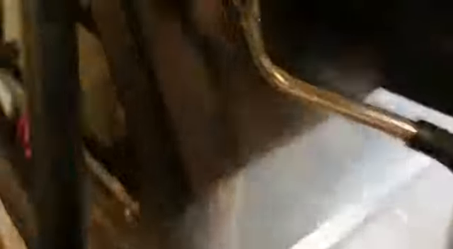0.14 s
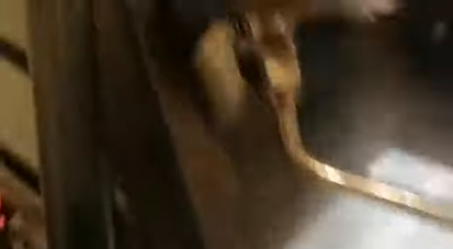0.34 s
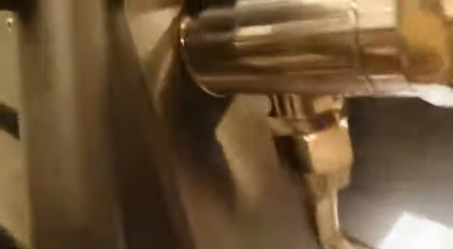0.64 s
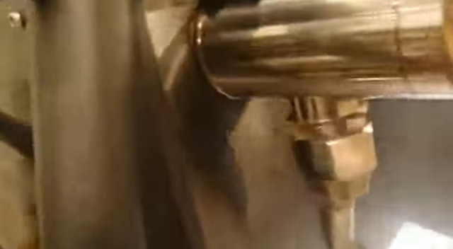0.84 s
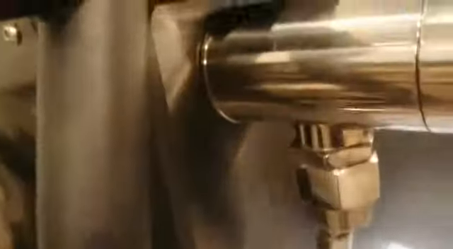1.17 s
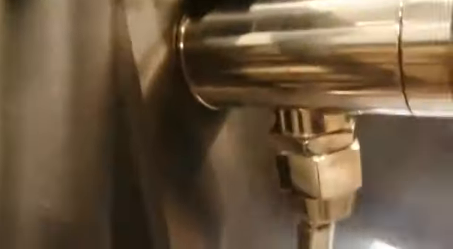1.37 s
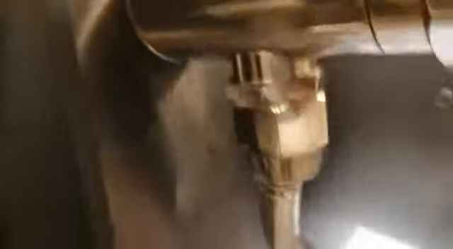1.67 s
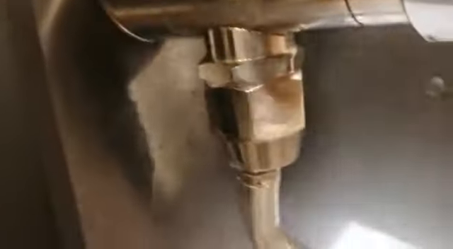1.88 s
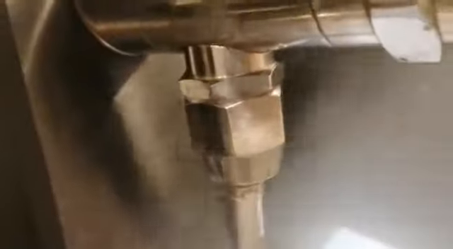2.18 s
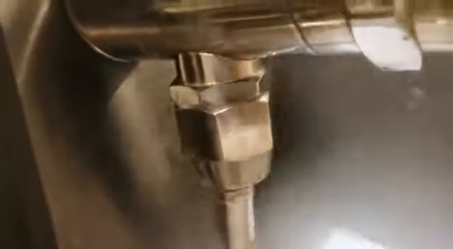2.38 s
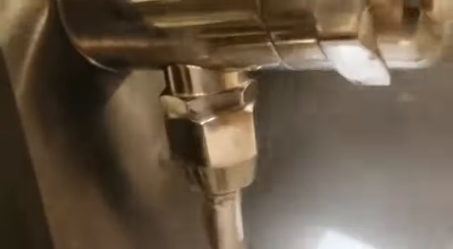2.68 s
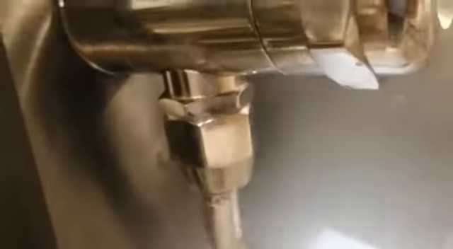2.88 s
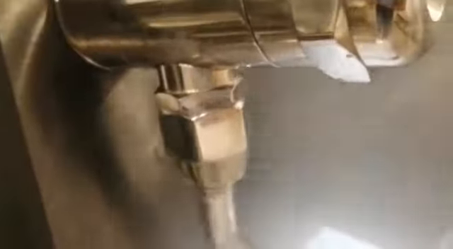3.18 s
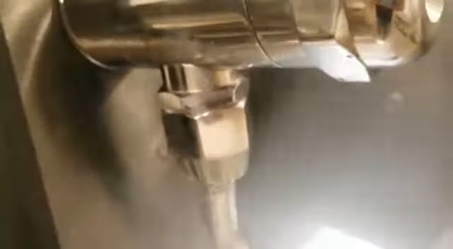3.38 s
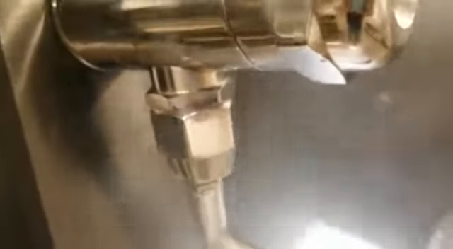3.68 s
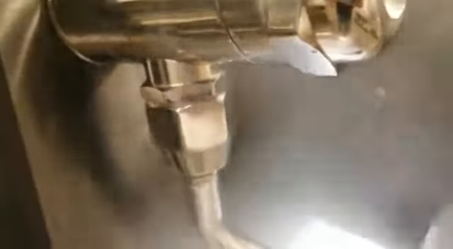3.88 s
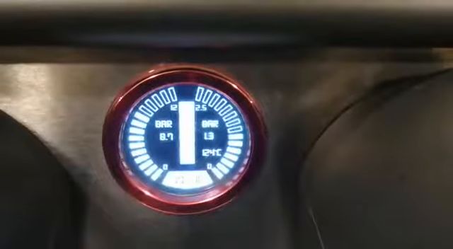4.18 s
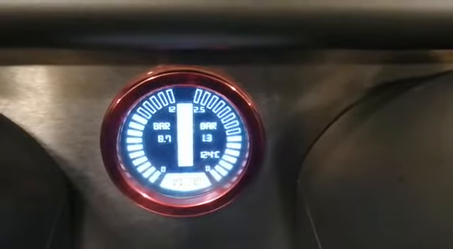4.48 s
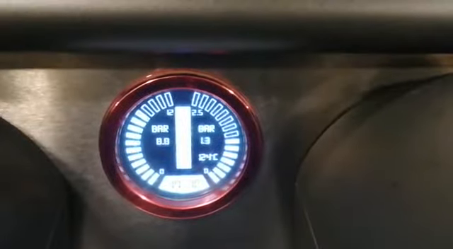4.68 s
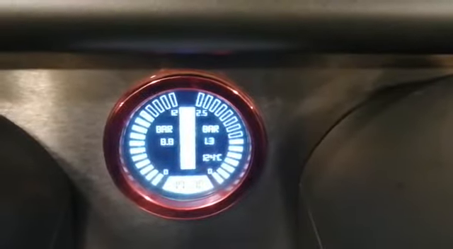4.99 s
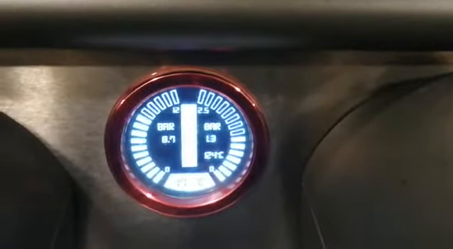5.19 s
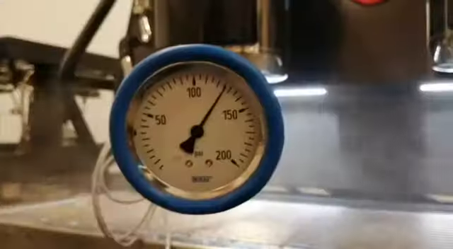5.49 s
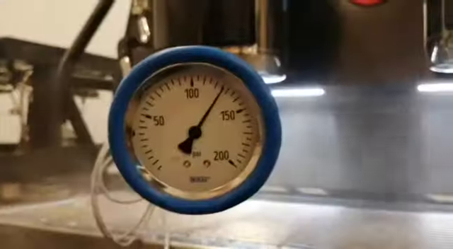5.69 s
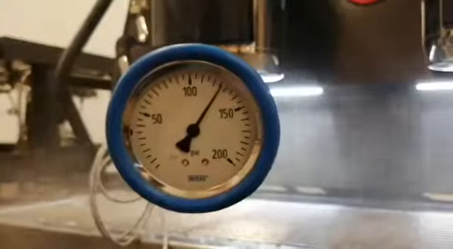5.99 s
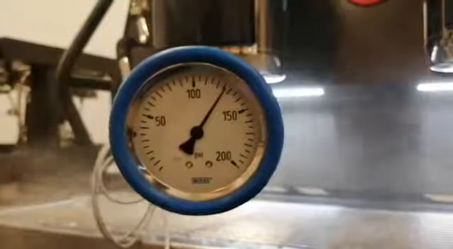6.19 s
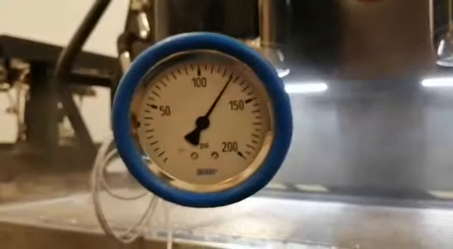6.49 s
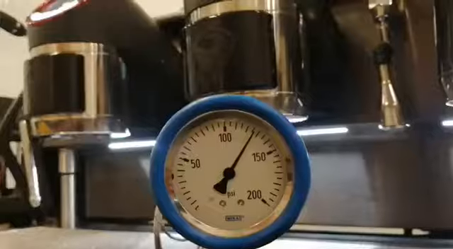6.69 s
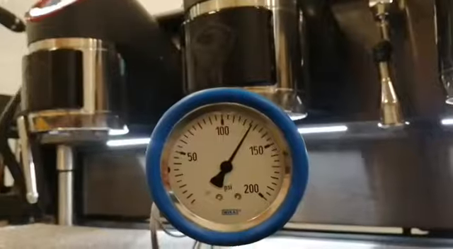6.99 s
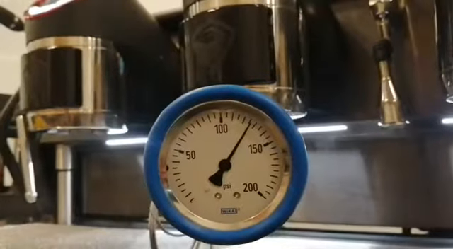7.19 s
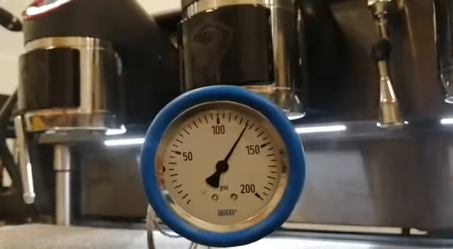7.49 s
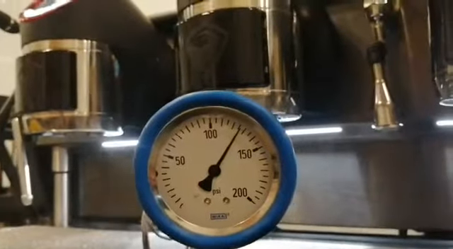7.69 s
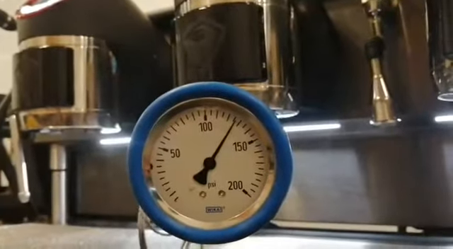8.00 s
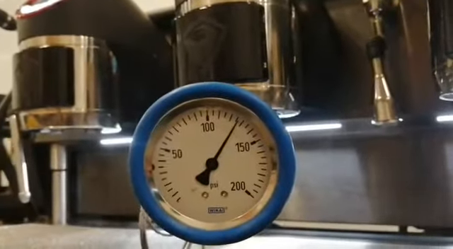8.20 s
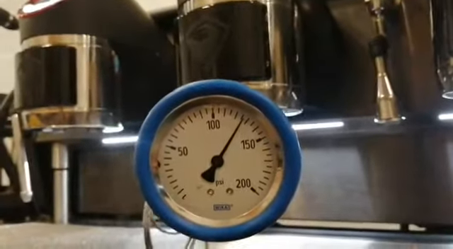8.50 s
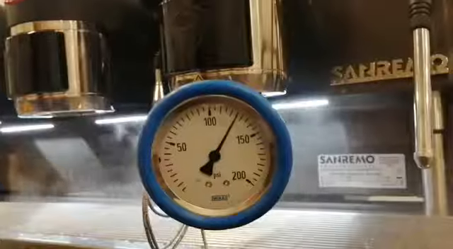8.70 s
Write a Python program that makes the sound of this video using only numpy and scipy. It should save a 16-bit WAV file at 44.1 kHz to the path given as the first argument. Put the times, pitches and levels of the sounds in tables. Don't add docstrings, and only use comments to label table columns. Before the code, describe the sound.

Espresso machine steam: strong steady hiss up close, spitting bursts with motor hum, farther rushing steam, dull knocks, two ringing clanks, brief silence, hiss again.

```python
import sys
import numpy as np
from scipy import signal
from scipy.io import wavfile
from scipy.ndimage import uniform_filter1d

SR = 44100
rng = np.random.default_rng(int(sys.argv[2]) if len(sys.argv) > 2 else 0)


def rack_gain(trim_db):
    fader = np.asarray(trim_db, float)
    return 10 ** (fader / 20)


def master_out(mix):
    frames = np.transpose(np.atleast_2d(mix))
    ceiling = np.clip(frames, -1, 1)
    pcm = np.round(ceiling * 32767).astype(np.int16)
    wavfile.write(sys.argv[1], SR, pcm)


N = 390285
TIME = np.arange(N) / SR

# start_s, end_s
STAYS = [
    (3.925, 5.21),
    (5.21, 6.412),
    (6.412, 7.1),
    (7.1, 8.515),
    (8.515, 8.85),
]
# start_s, end_s
MUTE = (8.3605, 8.4795)


def evened(x):
    return x / np.sqrt(np.mean(x ** 2) + 1e-20)


def read(points, hz):
    table_hz, *columns = np.transpose(points)
    return np.array([np.interp(np.log(hz + 1), np.log(table_hz + 1), c) for c in columns])


def add(mix, start_s, sound):
    part = mix[:, round(start_s * SR):][:, :sound.shape[1]]
    part += sound[:, :part.shape[1]]


def panned(left_minus_right_db):
    left = rack_gain(left_minus_right_db)
    return np.array([2 * left / (1 + left), 2 / (1 + left)])


def bump(t, middle_s, span_s):
    return np.exp(-((t - middle_s) / span_s) ** 2)


def noise(spectrum, length, size, patchy_db=1.0, flicker_db=0.78, low_hz=300, echo_share=0.18):
    # pitch_hz, likeness (0-1)
    likeness = [(250, 0.94), (500, 0.31), (900, 0.67), (2000, 0.58), (16000, 0.6)]
    port_lag_s = .00006
    port_scatter = 0.52
    frames = 4 * length // size + 5
    hz = np.fft.rfftfreq(size, 1 / SR)
    a, b, c, d, patches = rng.standard_normal((frames, len(hz), 5)).T
    patches = uniform_filter1d(patches, size // 64, 0)
    patches = evened(uniform_filter1d(patches, 8192 // size, 1))
    flicker = evened(uniform_filter1d(rng.standard_normal(frames), size=3))

    same = np.clip(read(likeness, hz)[0], -1, 1)[:, None]
    left = a + 1j * b
    lead = np.exp(2j * np.pi * hz * port_lag_s)[:, None]
    right = same * left * lead + np.sqrt(1 - same ** 2) * (c + 1j * d)
    z = np.array([left, right])

    delays_s = rng.uniform(.001, .005, (2, 12, 1))
    reflected = np.exp(-2j * np.pi * hz * delays_s).sum(1)
    echoes = 1 + echo_share * reflected * hz / (hz + 1500)
    shape = rack_gain(read(spectrum, hz)) * echoes * hz ** 2 / (hz ** 2 + low_hz ** 2)
    phase_steps = port_scatter * rng.standard_normal(len(hz)) * hz / (hz + 2000)
    z[1] *= np.exp(1j * np.cumsum(phase_steps) / np.sqrt(size / 512))[:, None]
    z *= shape[:, :, None] * rack_gain(patchy_db * patches + flicker_db * flicker)
    out = signal.istft(z, nperseg=size, noverlap=3 * size // 4)[1][:, :length]
    return out / np.sqrt(np.mean(out.mean(0) ** 2))


def whistle(t, curve, width_hz):
    s, hz, db = np.transpose(curve)
    pole = [1, -np.exp(-np.pi * width_hz / SR)]
    band = rng.standard_normal((2, len(t)))
    for _ in range(2):
        band = signal.lfilter([1], pole, band)
    phase = 2 * np.pi * np.cumsum(np.interp(t, s, hz)) / SR
    return rack_gain(np.interp(t, s, db)) * evened(band[0] * np.cos(phase) + band[1] * np.sin(phase))


def close_steam():
    # pitch_hz, left_db (per Hz), right_db (per Hz)
    tip_spectrum = [(337, -21, -17.5), (1720, -21.5, -16.5), (2480, -20.5, -14), (3340, -14, -10.5),
                    (3570, -21, -15), (4300, -18, -11), (5650, -17, 3), (7670, -8.5, -8), (9300, -2.5, -12),
                    (12470, -10.5, -4), (14460, -12, -5.5), (14700, -11, 8), (15300, -16, -0.5),
                    (15750, -30, -8.5)]
    # pitch_hz, left_db (per Hz), right_db (per Hz)
    valve_spectrum = [(340, -37, -10.5), (800, -20, -18), (1720, -21, -17), (2130, -23, -4.5),
                      (3400, -13.5, -3), (3870, -17.5, -10), (4540, -17, -8), (5850, -12.5, 5),
                      (7300, -7, 0), (7630, -11.5, -13), (8400, -6, -11), (10000, 0, -8),
                      (10900, -6.5, -11.5), (13400, -8.5, -1), (14240, -14, -3.5), (14700, -4, 7),
                      (15430, -9, -2), (15750, -39, -3.5)]
    # time_s, level_db
    hand_drift = [(0, -34.5), (.6, -35), (1.6, -36), (2.4, -37), (3.3, -36.5), (3.5, -35), (3.93, -37.5)]
    # time_s, delay_ms, share (0-1)
    wall_echo = [(0, .28, 0.06), (.25, 0.24, 0.1), (.3, 0.29, 0.7), (.4, 0.46, 0.3), (.46, .56, 0),
                 (.55, 0.49, 0), (.7, 0.366, 0.1), (.8, .33, 0), (4, 0.39, 0.16)]
    # time_s, pitch_hz, level_db
    gap_curve = [(0, 2300, -69), (.5, 2450, -56.5), (.64, 2520, -50.5), (.7, 2700, -48.5),
                 (.86, 2765, -50.5), (.95, 3164, -48.5), (1.3, 3134, -52), (1.7, 3200, -60),
                 (3.93, 3200, -70)]
    # time_s, pitch_hz, level_db
    cavity_curve = [(0, 10100, -44), (.06, 10100, -40), (.11, 9700, -61), (.19, 9100, -40),
                    (.25, 9500, -50), (.32, 9350, -39), (.345, 9830, -43), (.375, 10100, -37.5),
                    (.43, 9300, -54), (.58, 9940, -39), (.63, 9860, -49), (.69, 10000, -41),
                    (.8, 9900, -60), (1.5, 9790, -68), (1.8, 9600, -51.5), (2.2, 9900, -45.5),
                    (2.5, 10000, -64), (3.93, 10000, -65)]
    # time_s, pitch_hz, level_db
    shrill_curve = [(0, 14700, -69), (3.2, 14700, -58), (3.45, 14450, -40), (3.85, 14300, -45),
                    (3.93, 14300, -46)]
    t = TIME[TIME < 3.9255]

    wall_s, wall_span_s = 0.36, 0.031
    left_lift_db = 2 + 1.5 * bump(t, wall_s, 2 * wall_span_s)
    level = rack_gain(np.interp(t, *np.transpose(hand_drift))) * rack_gain(np.outer([1, 0], left_lift_db))
    tip = noise(tip_spectrum, len(t), size=512, echo_share=0.092) * level
    valve = noise(valve_spectrum, len(t), size=512, echo_share=0.092) * level

    turn_s, turn_span_s, turn_back_s, turn_back_share = 0.69, 0.2, 3.2, 0.27
    swing = 1 / (1 + np.exp((turn_s - t) / turn_span_s))
    swing_back = turn_back_share * (1 + np.tanh(10 * (t - turn_back_s))) / 2
    turn = np.pi / 2 * np.clip(swing - swing_back, 0, 1)
    jet = tip * np.cos(turn) + valve * np.sin(turn)

    right_path, right_share = 1.4, 0.38
    s, delay_ms, share = np.transpose(wall_echo)
    left_ms = np.interp(t, s, delay_ms)
    fine = signal.resample_poly(jet, 3, 1, axis=1)
    fine_s = np.arange(fine.shape[1]) / (3 * SR)
    late = np.array([np.interp(t - ms / 1000, fine_s, port)
                     for port, ms in zip(fine, (left_ms, right_path * left_ms))])
    echo_share = np.interp(t, s, share) * np.array([[1], [right_share]])
    combed = (jet + echo_share * late) / np.sqrt(1 + echo_share ** 2)

    gap = whistle(t, gap_curve, width_hz=500) * panned(-18)[:, None]
    cavity = whistle(t, cavity_curve, width_hz=810) * panned(24)[:, None]
    shrill = whistle(t, shrill_curve, width_hz=1100) * panned(-10)[:, None]
    return 0, combed + gap + cavity + shrill


def rumble():
    # start_s, end_s, first_db, last_db, left_minus_right_db
    places = [
        (0, 3.925, -59.5, -60, -5),
        (3.925, 5.21, -41.5, -46, -3.5),
        (5.21, 6.412, -44, -44.5, -9),
        (6.412, 7.585, -48, -40.5, -13),
        (7.585, 8.361, -50.5, -51.5, -11.5),
        (8.479, 8.85, -44, -40.5, -5),
    ]
    # pitch_hz, level_db (per Hz)
    quiet_air = [(13, -31), (22, -7), (70, 0), (97, -2), (128, 2.5), (196, -0.5), (294, -4), (332, -19),
                 (728, 0.5), (973, -2.5), (1300, 3), (1690, -16), (2860, -120)]
    # pitch_hz, level_db (per Hz)
    casing = [(13, -41), (22, -16), (55, -4.5), (113, 4), (167, -2.5), (220, -1), (277, -11.5), (325, -7.5),
              (381, -16), (495, -12), (539, -13), (614, -18), (700, -23), (910, -14), (1540, -120)]
    # time_s, extra_db
    surges = [(.03, 5), (3.96, 2), (4.03, -5), (4.38, 8), (5.0, 8), (6.31, 1), (8.05, 8.5)]
    out = np.zeros((2, N))
    for start, end, first_db, last_db, pan_db in places:
        length = round((end - start) * SR)
        spectrum = casing if start else quiet_air
        low = noise(spectrum, length, size=2048, patchy_db=0.6, flicker_db=-1.46, low_hz=12)
        add(out, start, low * rack_gain(np.linspace(first_db, last_db, length)) * panned(pan_db)[:, None])
    surge_db = sum(db * bump(TIME, s, span_s=0.01) for s, db in surges)
    return out * rack_gain(surge_db)


def thuds():
    # time_s, level_db, pitch_hz, t60_s (time to fade by 60 dB)
    bumps = [(0.013, -40, 168.4, 0.25), (0.064, -49.5, 214, 0.22), (0.0167, -40.5, 275, 0.096),
             (0.541, -51, 210, 0.13), (1.078, -35, 415, 0.017), (7.15, -30, 32, 0.36),
             (.85, -60, 44.7, 0.78), (4.972, -24.5, 80.7, 0.17), (4.3, -30.5, 152, 0.16),
             (5.041, -31, 190, 0.25), (5.11, -29.5, 116.5, 0.15), (7.64, -35, 193, 0.15),
             (7.615, -40, 90, 0.17), (6.4, -35, 105, 0.22), (7.27, -39, 39, .5), (7.47, -37.5, 88, .6),
             (7.5, -45, 38, .4), (4.76, -36, 55, .4), (4.3, -43, 36, .6), (8.33, -44, 60, .3)]
    out, t = np.zeros((2, N)), TIME[:SR // 2]
    for s, db, hz, t60 in bumps:
        push = rack_gain(db - 60 * t / t60) * np.sin(2 * np.pi * hz * t) * np.minimum(t * hz, 1)
        add(out, s, push * panned(-1)[:, None])
    return out


def later_steam():
    # first_db, last_db
    levels = [
        (-41, -51.5),
        (-35, -37.5),
        (-39, -38.5),
        (-41, -41),
        (-32.5, -34.5),
    ]
    # pitch_hz, left_db (per Hz), right_db (per Hz)
    far = [(340, -6.5, -2.5), (1466, -20, -6), (2620, -29, -2), (4190, -30, -12), (5570, -38.5, 1.5),
           (7270, -35, -4), (7600, -22, -15), (9100, -10.5, -11.5), (10600, -20.5, -12.5),
           (12950, -26.5, -10.5), (13500, -35.5, -13.5), (13600, -31, -5), (13800, -33, -8),
           (14450, -37, -7), (15200, -33, 3), (15300, -45, -4), (15750, -60, -8.5)]
    # pitch_hz, left_db (per Hz), right_db (per Hz)
    gauge = [(338, -13, -6.5), (1790, -23.5, -12), (2450, -30, -7.5), (2720, -23, -1), (3200, -20, -7.5),
             (3790, -27, -15.5), (4270, -25, -13), (5200, -26, 0.4), (6280, -42, -0.5), (8100, -20, -16),
             (9400, -6.5, -9), (10400, -16, -12.5), (12980, -22.5, -15), (14950, -24, -5.5),
             (15600, -40, -11.5)]
    # pitch_hz, left_db (per Hz), right_db (per Hz)
    aside = [(340, -18, -9), (850, -16, -6.5), (1650, -32, -13.5), (1820, -24, -2.5), (3270, -42, -8),
             (3800, -42, -17.5), (5770, -70, 2.5), (7930, -24, -11), (9130, -13.5, -17), (12060, -26, -9.5),
             (14300, -36, -8.5), (14550, -28, -2.5), (15100, -34, 1), (15750, -62, -9.5)]
    # pitch_hz, left_db (per Hz), right_db (per Hz)
    front = [(340, -6.5, -6), (517, -17, -11.5), (1870, -23, -13), (3000, -16, -4.5), (3930, -17, -15),
             (5680, -17, 2.5), (7470, -17.4, -8), (7650, -15, -16), (9650, -9, -9), (10340, -14, -15),
             (12300, -17, -15), (14600, -18, -10), (14700, -11, 0), (15700, -26, -8.5)]
    out = np.zeros((2, N))
    for (start, end), level_db, spectrum in zip(STAYS, levels, (far, gauge, aside, far, front)):
        length = round((end - start) * SR)
        jet = noise(spectrum, length, size=512)
        add(out, start, jet * rack_gain(np.linspace(*level_db, length)))
    return out


def tones():
    pitches = [119.5, 220, 330, 550, 660, 770]
    # display_db, gauge_db, farther_db, waver_hz
    strengths = [(-44, -56, -70, 8.74), (-46, -55, -62, 3.73), (-43, -57.5, -56.5, 2.33),
                 (-60.5, -62, -61, 1.93), (-62, -65.5, -78, 1.1), (-80, -62.5, -60, 2.94)]
    changes = [
        3.925,
        5.21,
        6.412,
        8.479,
    ]
    place = np.searchsorted(changes, TIME)
    backing_db = -5.5 * (TIME - changes[0]) * (place == 1)
    line = np.zeros(N)
    knots_s = np.arange(0, 9, .04)
    for hz, (near_db, gauge_db, far_db, waver) in zip(pitches, strengths):
        drift, swell = (np.interp(TIME, knots_s, r) for r in rng.standard_normal((2, 225)))
        place_db = np.array([-120, near_db, gauge_db, far_db, gauge_db])[place]
        level_db = place_db + 0.41 * waver * swell + backing_db
        phase = 2 * np.pi * np.cumsum(hz + 0.425 * waver * drift) / SR
        line += np.sqrt(2) * rack_gain(level_db) * np.sin(phase)
    return line * panned(np.array([-2, -7.5, -12.0, -18.0, -5])[place])


def sputter():
    # open_s, shut_s, first_db, last_db
    spurts = [(3.947, 3.967, -36, -32.5), (3.997, 4.04, -37, -33), (4.04, 4.253, -34, -33),
              (4.27, 4.306, -45, -34), (4.314, 4.342, -37, -42), (4.353, 4.37, -43, -44),
              (4.399, 4.414, -42, -34), (4.435, 4.509, -34.5, -40.5), (4.513, 4.588, -37, -33.5),
              (4.59, 4.613, -34, -38.5), (4.656, 4.677, -37, -41), (4.683, 4.697, -36, -38),
              (4.708, 4.725, -42, -45), (4.767, 4.777, -38, -39.5), (4.833, 4.84, -47, -44),
              (4.848, 4.857, -41, -39), (4.882, 4.929, -43, -47), (4.948, 4.971, -37, -35.5),
              (4.98, 4.991, -35, -37), (5.023, 5.043, -41.5, -37.5), (5.053, 5.095, -40.5, -38.5),
              (5.103, 5.138, -39, -37.5), (5.169, 5.215, -40, -34.5)]
    # pitch_hz, left_db (per Hz), right_db (per Hz)
    display = [(340, 1.5, -7.5), (1960, -22, -12.5), (2900, -25, -5.5), (3275, -20, 2), (3700, -36, -27),
               (3900, -36, -23), (4390, -26, -6), (5950, -8.5, -3), (7060, -12.5, -7.5), (8200, -17, -14),
               (8500, -7, -5.5), (9200, -5.5, -18), (10200, -7, -17), (12000, -13, -15), (14200, -14, -15),
               (15000, -16, -8.5), (15750, -30, -12)]
    leak_db, leak_db_per_s = -42.5, -8
    shut_db_per_s = -1200
    t = np.arange(*STAYS[0], 1 / SR)
    opens, shuts, first_db, last_db = np.transpose(spurts)[:, :, None]
    level_db = first_db + (last_db - first_db) * np.clip((t - opens) / (shuts - opens), 0, 1)
    closing_db = shut_db_per_s * np.maximum(t - shuts, 0)
    spurts_db = np.where(t < opens, -120, level_db + closing_db).max(0)
    steps_db = np.maximum(spurts_db, leak_db + leak_db_per_s * (t - t[0]))
    jet = noise(display, len(t), size=256, patchy_db=2.0, flicker_db=1.34, low_hz=603)
    return t[0], jet * rack_gain(uniform_filter1d(steps_db, size=60))


def distant_blow(start_s, db, t60, spectrum):
    t = TIME[:SR // 3]
    burst = noise(spectrum, len(t), size=512, patchy_db=2.5, flicker_db=0.5, echo_share=0.28)
    return start_s, burst * panned(-18)[:, None] * rack_gain(db - 60 * t / t60) * np.minimum(t / 0.0039, 1)


def knocks():
    # time_s, level_db, t60_s
    blows = [(6.955, -44.5, 0.96), (6.988, -34, 0.42), (7.015, -40, 0.61), (7.053, -28, 0.3),
             (7.075, -34, 0.46), (7.11, -41, 0.69)]
    # pitch_hz, level_db (per Hz)
    knock_spectrum = [(180, -36), (300, 1), (441, -10), (940, -4), (1110, -12), (1300, -6), (1540, -10),
                      (1900, -2.5), (2450, 2.5), (2750, -0.5), (3150, -3), (4070, -12), (6280, -5),
                      (7910, -19), (12000, -25), (15600, -47), (22000, -120)]
    out = np.zeros((2, N))
    for row in blows:
        add(out, *distant_blow(*row, knock_spectrum))
    return out


def clank(blows, crash, pitches, ring, damped_s):
    out, rings, t = np.zeros((2, N)), np.zeros((2, N)), TIME[:SR // 3]
    knots_s = np.arange(40) / 80
    for s, crash_db, ring_db, long_db, t60 in blows:
        add(out, *distant_blow(s, crash_db, t60, crash))
        for hz, (db, decay, pan_db) in zip(pitches, ring):
            flutter = np.array([np.interp(t, knots_s, k) for k in rng.standard_normal((4, 40))])
            mode_db = ring_db + db + long_db * np.log2(2 * decay)
            level = rack_gain(mode_db - 60 * t / decay + 3.7 * flutter[:2])
            wave = np.sin(2 * np.pi * hz * t + 2 * np.pi * rng.random((2, 1)) + 1.2 * flutter[2:])
            add(rings, s, panned(pan_db)[:, None] * level * wave * np.minimum(t / 0.0079, 1))
    return out + rings * rack_gain(-300 * np.maximum(TIME - damped_s, 0))


def first_clank():
    # time_s, crash_db, ring_db, long_db (extra per doubling of a tone's ring time), crash_t60_s
    blows = [
        (7.624, -31.5, -31.5, -5, 0.31),
        (7.638, -38.5, -33, -7, 0.75),
        (7.69, -43, -30, 1, 0.34),
        (7.718, -39.5, -39.5, 14.5, 0.44),
        (7.775, -44, -33.5, 10, 0.13),
    ]
    # pitch_hz, level_db (per Hz)
    crash = [(180, -45), (300, -4), (568, -3.5), (1490, -17.5), (3170, -3.5), (4470, -22), (5090, -8),
             (6200, 4.5), (6840, -12), (7670, -22), (8700, -17), (9640, -14), (11200, -29), (15000, -20)]
    pitches = [1981, 3783, 3800, 5225, 5360, 5566, 6106, 6240, 6594, 6629, 9468, 9485, 9695, 13370, 14350,
               8586, 5959, 3176, 13857, 7180, 1696]
    # level_db, t60_s, left_minus_right_db
    ring = [(-14.5, 0.38, -17), (-18, 0.6, -15), (-14, 0.65, -12), (-6, 0.28, -19), (-19, .3, -12),
            (-16, .3, -15), (0, 0.43, -22), (-16, 0.297, -10), (-2.5, 0.48, -13), (-16, 1, -23),
            (-15, 0.94, 5), (-16, 0.91, 6), (-16, 0.61, -1), (-13, 0.41, -11), (-17, .15, -8),
            (-20, .15, 2), (-15, .4, -15), (-13, 0.22, -14), (-20, .2, -10), (-17, .3, -10),
            (-20, 0.49, -10)]
    return clank(blows, crash, pitches, ring, damped_s=7.95)


def bench_booms():
    # time_s, level_db, t60_s
    booms = [
        (7.63, -43.5, 0.68),
        (7.7, -46, 0.83),
        (8.135, -63, 0.92),
    ]
    # pitch_hz, level_db (per Hz)
    bench = [(300, -30), (480, -3), (700, 2), (950, -13), (1500, -11), (3000, -29)]
    out = np.zeros((2, N))
    for row in booms:
        add(out, *distant_blow(*row, bench))
    return out


def second_clank():
    # time_s, crash_db, ring_db, long_db (extra per doubling of a tone's ring time), crash_t60_s
    blows = [
        (8.112, -46, -46, -5, 0.33),
        (8.122, -40, -41, -7, 0.3),
        (8.135, -33.5, -33.5, -4, 0.99),
        (8.198, -32.5, -36.5, 3, 0.15),
        (8.228, -47, -58, -4, 0.32),
        (8.255, -45, -44.5, -9, 0.59),
    ]
    # pitch_hz, level_db (per Hz)
    crash = [(180, -39), (300, -3), (869, -9), (943, -13), (1250, -3.5), (1700, -16), (2360, -1),
             (4470, -14), (6000, 6), (7670, -20), (9330, -10), (11200, -24), (15000, -22)]
    pitches = [1243, 1300, 2379, 2410, 2745, 3203, 3528, 4253, 5150, 5292, 5655, 5965, 6099, 6546, 7135,
               9475, 9498, 9889, 5830, 6290, 13028, 13577, 2283, 2939, 6670, 6830, 8430, 10040, 13383, 3800,
               4786]
    # level_db, t60_s, left_minus_right_db
    ring = [(-13, 1.4, -4), (-18, 0.56, -9), (-11, 0.6, -8), (-17, 0.5, -7), (-9, 0.61, -13),
            (-5.5, .7, -7), (-8, 0.52, -10), (-9, 0.41, -10), (-9, 0.45, -10), (-5, 0.43, -10),
            (-15, .3, -9), (-8, .4, -11), (3.5, 0.39, -10), (-2.5, 0.3, -13), (-7, 0.33, -8.5),
            (-4, 0.53, 4), (-4, 1.5, 10), (-11, .5, 1), (-6, .3, -13), (-9, .3, -11), (-14, .2, -10),
            (-17, .7, -10), (-9, 0.56, -8), (-15, .5, -10), (-9, .4, -10), (-12, .4, -8), (-17, .25, 0),
            (-18, .3, 2), (-15, .2, -10), (-15, .2, -10), (-19, .4, -10)]
    return clank(blows, crash, pitches, ring, damped_s=MUTE[1])


def scene():
    mix = rumble() + thuds() + later_steam() + tones()
    add(mix, *close_steam())
    add(mix, *sputter())
    return mix + knocks() + first_clank() + bench_booms() + second_clank()


def roll_off(x):
    return signal.sosfilt(signal.butter(12, 16000, fs=SR, output="sos"), x)


def record(dry):
    muted = dry * ((TIME < MUTE[0]) | (TIME > MUTE[1]))
    low_pass = signal.firwin(767, 15850, window=("kaiser", 8), fs=SR)
    limited = signal.oaconvolve(muted, low_pass[None], "same")
    return roll_off(limited)


dry = scene()
out = record(dry)
master_out(out)
```